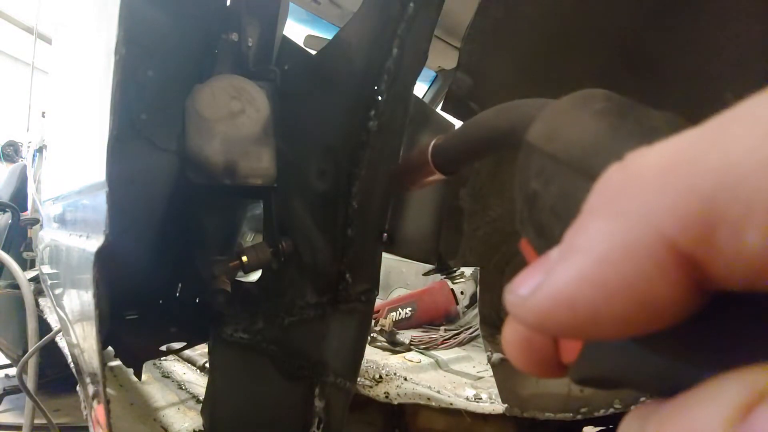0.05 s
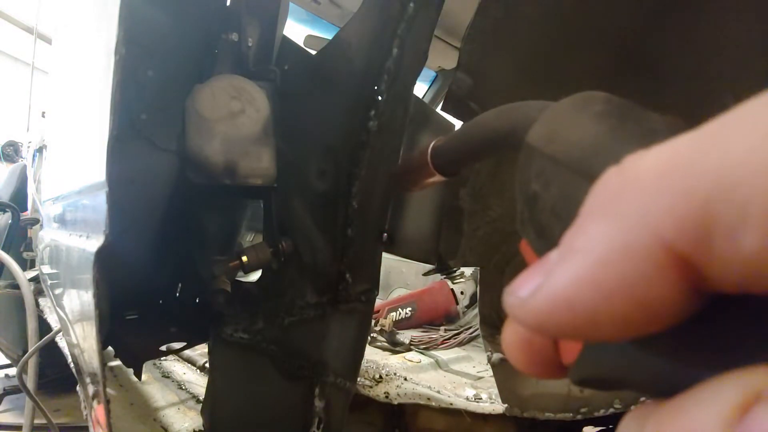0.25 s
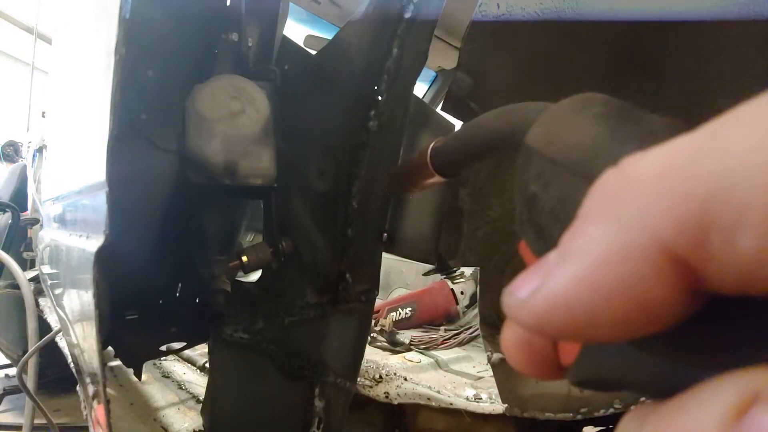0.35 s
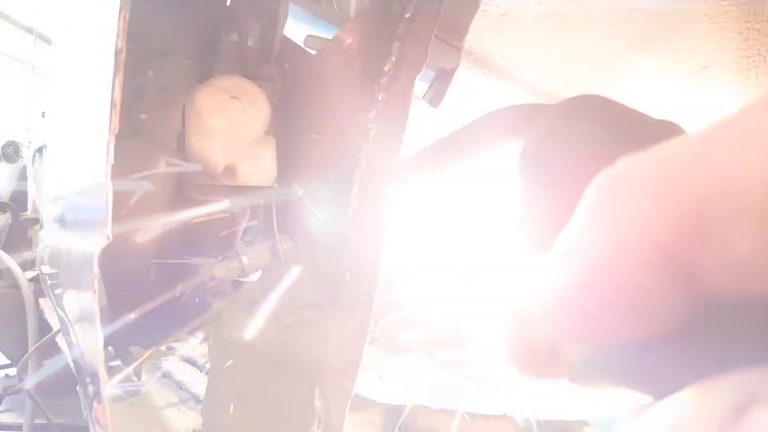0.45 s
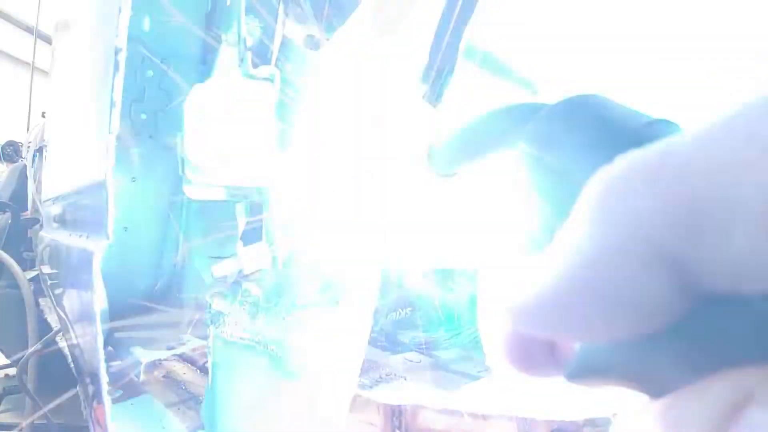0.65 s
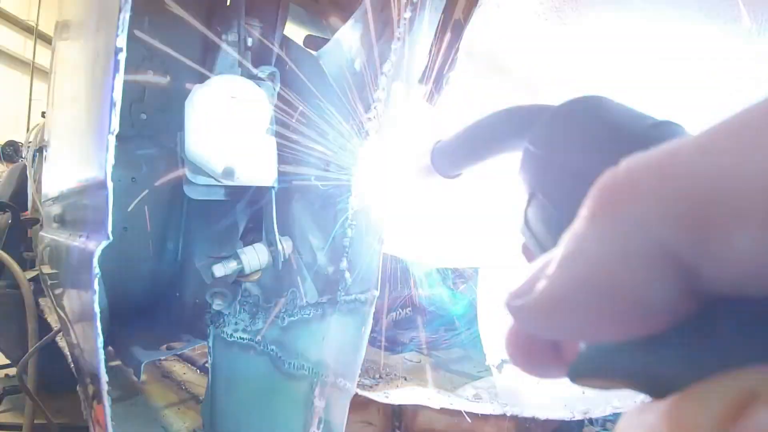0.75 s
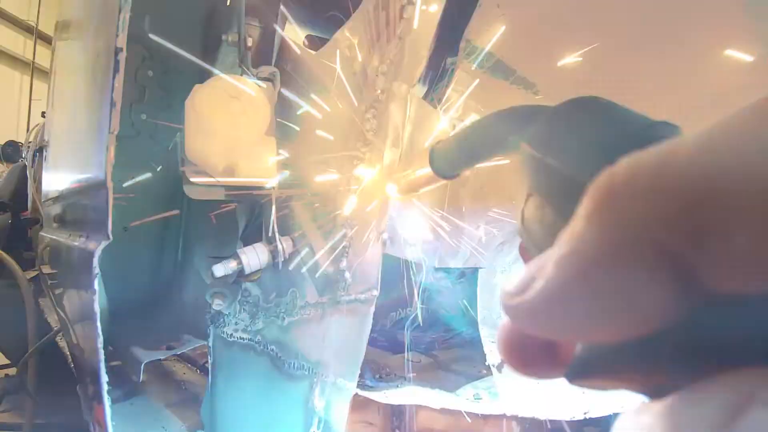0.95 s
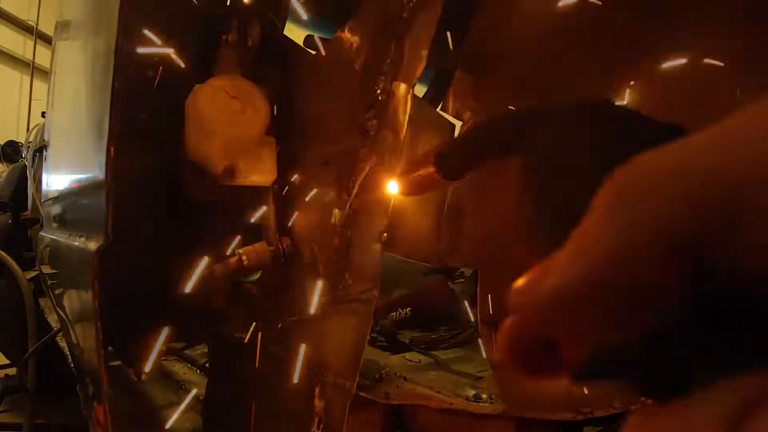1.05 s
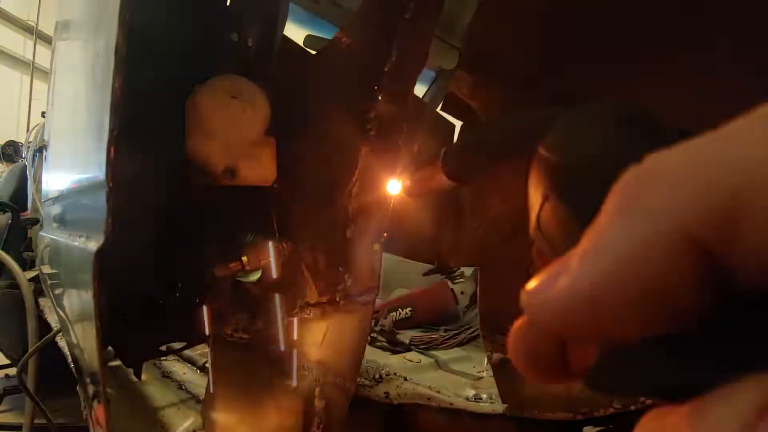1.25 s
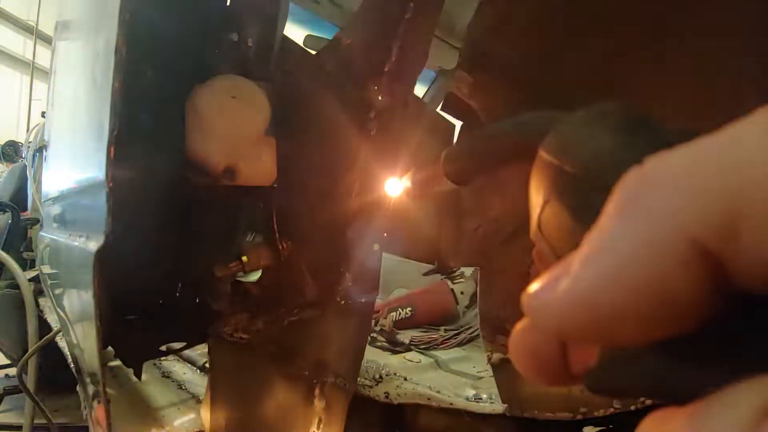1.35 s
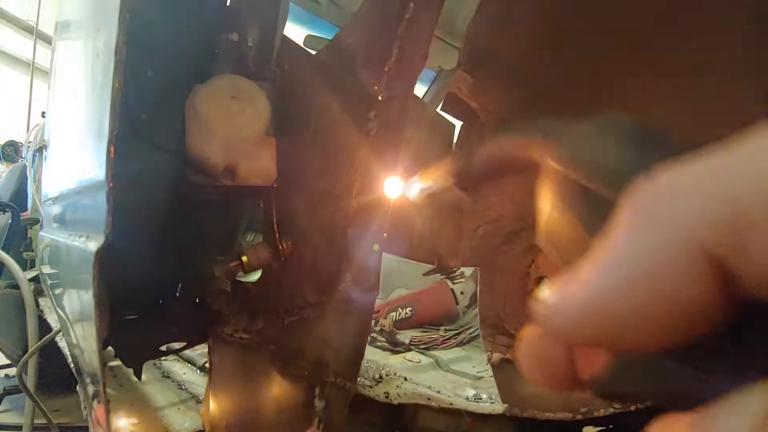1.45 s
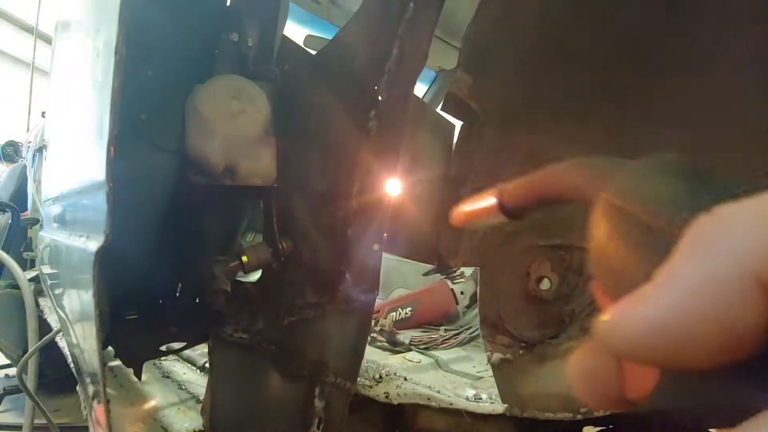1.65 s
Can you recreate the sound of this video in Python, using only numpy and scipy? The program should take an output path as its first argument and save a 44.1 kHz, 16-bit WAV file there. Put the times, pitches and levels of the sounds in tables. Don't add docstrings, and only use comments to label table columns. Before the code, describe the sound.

A welding gun clicks, hisses gas, then crackles in a harsh buzzing burst on sheet metal.

```python
import sys
import numpy as np
from scipy import signal
from scipy.fft import rfft, irfft
from scipy.io import wavfile
from scipy.ndimage import uniform_filter1d, map_coordinates

SR = 44100
rng = np.random.default_rng(int(sys.argv[2]) if len(sys.argv) > 2 else 0)


def magnitude_from_level(level_db):
    exponent = np.asarray(level_db, float) / 20
    return 10 ** exponent


def digitize_waveform(pressure):
    field = np.atleast_2d(pressure).T
    bounded = np.clip(field, -1, 1)
    quanta = np.round(bounded * 32767).astype(np.int16)
    wavfile.write(sys.argv[1], SR, quanta)


N = 74970
T = np.arange(N) / SR
FFT_SIZE = 2 ** 17
F = np.arange(FFT_SIZE // 2 + 1) * SR / FFT_SIZE


def unit(x):
    return x / np.sqrt(np.mean(x ** 2))


def curve(table):
    return magnitude_from_level(np.interp(T, *np.array(table).T))


def shape(table):
    hz, db = np.array(table).T
    return np.interp(np.log(F + 1), np.log(hz), db)


def bumps(table):
    return sum(db / (1 + ((F - hz) / (width_hz / 2)) ** 4) for hz, width_hz, db in table)


def colour(x, response_db):
    cepstrum = irfft(response_db * np.log(10) / 20)
    cepstrum[1:FFT_SIZE // 2] *= 2
    cepstrum[FFT_SIZE // 2 + 1:] = 0
    return irfft(rfft(x, FFT_SIZE) * np.exp(rfft(cepstrum)))[..., :N]


def walk(rate_hz):
    span = int(SR / rate_hz)
    noise = rng.standard_normal(N + 2 * span)
    smooth = uniform_filter1d(uniform_filter1d(noise, span), span)
    return unit(smooth[span:span + N])


def pair(shared, size=N):
    noise = rng.standard_normal((3, size))
    return np.sqrt(shared) * noise[0] + np.sqrt(1 - shared) * noise[1:]


def fade(age_s, t60_s):
    return (age_s >= 0) * np.exp(-np.log(1000) * np.maximum(age_s, 0) / t60_s)


def ring(hz, age_s, t60_s):
    return np.sin(2 * np.pi * hz * age_s) * fade(age_s, t60_s)


def fan():
    # multiple of the pitch, left level in dB, right level in dB, right lead in turns.
    fan_tones = [
        (1, -38.5, -42.5, 0),
        (2, -46, -51, .42),
        (2.33, -54, -66, .2),
        (3, -56, -60, .3),
        (.435, -51, -51, 0),
        (.478, -53, -52, 0),
    ]
    pitch_hz = 504.8 + 0.57 * walk(10)
    turns = np.cumsum(pitch_hz) / SR
    hum = np.zeros((2, N))
    for multiple, left_db, right_db, lead_turns in fan_tones:
        phase_turns = multiple * turns + np.array([[0], [lead_turns]])
        hum += np.sqrt(2) * magnitude_from_level([[left_db], [right_db]]) * np.sin(2 * np.pi * phase_turns)
    return hum * magnitude_from_level(0.8 * walk(6.5))


def shop_air():
    air_spectrum = shape([(20, -14), (230, -3.5), (400, -16), (1200, -5.5), (2400, -10.5), (2900, -15.5),
                          (7000, -32.5), (16000, -52.5)])
    shared_hz, level_db = 1220, -39.5
    low_db = -20 * np.log10(1 + (F / shared_hz) ** 2)
    high_db = 20 * np.log10(1.001 - magnitude_from_level(low_db))
    air = colour(pair(0.91), air_spectrum + low_db) + colour(pair(0.28), air_spectrum + high_db)
    return unit(air) * magnitude_from_level(level_db + 0.65 * walk(2))


def draught():
    # start in seconds, level in dB, frequency in Hz.
    air_thumps = [
        (.472, -6, 45),
        (.875, -14, 50),
        (.988, 2, 48),
    ]
    rumble_hz, rumble_db, gust_db, gusts_per_s, left_db = 62, -37.5, 2.5, 14, -12
    low_pass_db = -20 * np.log10(1 + (F / rumble_hz) ** 2)
    high_pass_db = -20 * np.log10(1 + (35 / (F + 1)) ** 2)
    rumble = unit(colour(pair(0.26), low_pass_db + high_pass_db))
    rumble = rumble * magnitude_from_level(rumble_db + gust_db * walk(gusts_per_s))
    thumps = sum(-magnitude_from_level(db) * ring(hz, T - at_s, 0.11) for at_s, db, hz in air_thumps)
    return (rumble + thumps) * magnitude_from_level([[left_db], [0]])


def gas():
    # time in seconds, level in dB.
    gas_flow = [
        (.207, -50),
        (.212, -27),
        (.28, -26.5),
        (.455, -30.5),
        (.55, -22.5),
        (1.05, -30),
        (1.16, -32),
        (1.3, -41.5),
        (1.7, -44.5),
    ]
    # frequency in Hz, level in dB.
    gas_colour = [(200, -0.5), (900, -12.5), (1500, 3), (2500, -4.5), (5000, 0), (7000, -1.5), (11000, -9),
                  (16000, -21)]
    hose_hz, hose_width_hz, hose_db = 1730, 190, -4
    hose_starts_s, hose_ends_s = 0.21, 0.47
    hiss = unit(colour(pair(0.5), shape(gas_colour))) * magnitude_from_level(0.8 * walk(40))
    whistle_db = -40 + bumps([(hose_hz, hose_width_hz * 3, 40)])
    hose = unit(colour(pair(0.7), whistle_db)) * magnitude_from_level(1.2 * walk(60))
    hose = hose * np.clip((T - hose_starts_s) / 0.027, 0, 1) * np.clip((hose_ends_s - T) / 0.0095, 0, 1)
    return curve(gas_flow) * (hiss + magnitude_from_level(hose_db) * hose)


def valve():
    # start in seconds, frequency in Hz, level in dB, T60 in seconds.
    valve_rings = [
        (.2095, 12000, -14, .014),
        (.2108, 2200, -11, .014),
        (.2147, 2000, -14, .022),
        (.2149, 2450, -17, .022),
        (.211, 4900, -20, .02),
        (.2165, 400, -28, .02),
        (.2298, 2000, -22, .012),
        (.2125, 230, -26, .04),
    ]
    snap_at_s, snap_db, snap_t60_s = 0.2095, -29, 0.06
    rings = np.zeros(N)
    for at_s, hz, db, t60_s in valve_rings:
        onset = np.clip((T - at_s) / 0.0003, 0, 1)
        rings += magnitude_from_level(db) * ring(hz, T - at_s, t60_s) * onset
    return rings + magnitude_from_level(snap_db) * pair(0.43) * fade(T - snap_at_s, snap_t60_s)


def arc():
    # start in seconds, peak in dB, thud in dB.
    strike_breaks = [(0.4685, -12.6, -3.0), (0.5699, -18.5, -2.0), (0.5884, -12.2, 2.0),
                     (0.6254, -16.4, -1.0), (0.6427, -16.0, -6.2), (0.6526, -14.4, -0.2),
                     (0.6602, -15.8, -3.3), (0.671, -12.6, -1.4), (0.6802, -16.1, -8.3),
                     (0.6903, -13.8, -4.0), (0.7001, -16.7, -4.8), (0.7111, -11.8, -7.2),
                     (0.7219, -15.6, -2.6), (0.733, -13.9, 0.5), (0.7466, -14.6, -3.3),
                     (0.7582, -12.1, -2.2), (0.7718, -13.4, -4.6), (0.785, -11.5, 1.5),
                     (0.7959, -15.4, -5.4), (0.8082, -12.7, 0.6), (0.819, -17.5, -3.5)]
    # start in seconds, peak in dB, thud in dB.
    burn_breaks = [(0.8428, -11.2, 0.7), (0.8557, -11.4, 0.3), (0.8679, -12.2, 1.4), (0.8807, -12.8, 0.0),
                   (0.8929, -12.2, 1.4), (0.9043, -15.3, -3.5), (0.915, -15.3, -2.5), (0.9279, -16.1, -1.5),
                   (0.9398, -13.9, -0.6), (0.9504, -14.5, -4.5), (0.962, -11.3, -1.2),
                   (0.9736, -12.4, -3.4), (0.9855, -13.5, 3.7), (0.9982, -12.4, 3.4), (1.0114, -13.4, -2.1),
                   (1.0233, -14.3, -0.8), (1.032, -20.6, -10.0)]
    # frequency in Hz, level in dB.
    arc_colour = [(60, -5.5), (180, 3), (700, -1.5), (1500, 4), (3000, 2), (6000, 2), (11000, -3),
                  (16000, -2.5)]
    crack_db, click_s = 27, 4e-5
    thud_hz, thud_db, thud_t60_s = 1100, -6.5, 0.003
    fizz_db, fizz_low_db, fizz_grain_db, fizz_shared = -13, -9, 1.5, 0.45
    first_hold_s, hold_s, fizz_t60_s = 0.009, 0.003, 0.012
    after_db, after_t60_s = -4.5, 0.085
    spatter = colour(pair(fizz_shared), fizz_low_db / (1 + (F / 2500) ** 2))
    spatter = spatter * magnitude_from_level(fizz_grain_db * walk(1500))
    cracks = np.zeros((2, N))
    for k, (at_s, peak_db, sheet_db) in enumerate(list(strike_breaks) + list(burn_breaks)):
        near = slice(int(at_s * SR) - 20, int(at_s * SR) + 4000)
        age_s = T[near] - at_s - 0.0002
        click = -age_s / click_s * np.exp(-(age_s / click_s) ** 2)
        thud = magnitude_from_level(sheet_db + thud_db) * ring(thud_hz, age_s, thud_t60_s)
        late_s = np.maximum(age_s - (hold_s if k else first_hold_s), 0)
        decay = fade(late_s, fizz_t60_s) + magnitude_from_level(after_db) * fade(late_s, after_t60_s)
        fizz = magnitude_from_level(fizz_db) * spatter[:, near] * (age_s > 0) * decay
        cracks[:, near] += magnitude_from_level(peak_db + crack_db) * (click + thud + fizz)
    return colour(cracks, shape(arc_colour))


def garage(x):
    early_db, early_t60_s, room_db, room_t60_s = -11, 0.012, -19, 0.25
    age_s = T[:SR // 2]
    early = pair(0.6, len(age_s)) * fade(age_s - 0.0003, early_t60_s)
    room = pair(0.4, len(age_s)) * fade(age_s, room_t60_s) * np.clip(age_s / 0.024, 0, 1)

    def unit_energy(response):
        return response / np.sqrt(np.mean(np.sum(response ** 2, axis=1)))

    echo = magnitude_from_level(early_db) * unit_energy(early) + magnitude_from_level(room_db) * unit_energy(room)
    return x + signal.fftconvolve(x, echo, axes=1)[:, :N]


def scene():
    return fan() + shop_air() + draught() + gas() + garage(valve() + arc())


def band_limit(x):
    return signal.sosfilt(signal.butter(12, 16800, fs=SR, output="sos"), x)


def record(dry):
    # resonance or dip in Hz, width in Hz, level in dB.
    left_port = [(4800, 900, 4), (6200, 900, 7), (8800, 1300, -19), (11800, 1400, 6), (12750, 400, -14),
                 (15600, 500, 9), (2000, 700, -3), (1100, 700, 1.5)]
    # resonance or dip in Hz, width in Hz, level in dB.
    right_port = [(6800, 300, 13), (7170, 300, 16), (8850, 1150, -60), (10150, 400, -22), (10650, 250, -14),
                  (12650, 250, -16), (14600, 600, 5), (15550, 400, 9), (900, 250, -4), (600, 350, 2.5),
                  (2000, 900, 4), (4850, 250, 4)]
    # time in seconds, gain in dB.
    gain_control = [
        (.4665, 0),
        (.4685, -11),
        (.48, -14),
        (1.06, -14),
        (1.16, -9.5),
        (1.28, -7),
        (1.45, -4),
        (1.7, -3),
    ]
    top_hz, left_lag_s, ports_db = 15800, 0.0001, -4
    top_cut_db = -45 / (1 + np.exp((top_hz - F) / 40))
    left = colour(dry[0], bumps(left_port) + top_cut_db)
    left = map_coordinates(left, [(T - left_lag_s) * SR], mode="nearest")
    right = colour(dry[1], bumps(right_port) + top_cut_db)
    mix = np.array([left, right]) * magnitude_from_level(ports_db) * curve(gain_control)
    return band_limit(np.clip(mix, -1, 1))


dry = scene()
out = record(dry)
digitize_waveform(out)
```